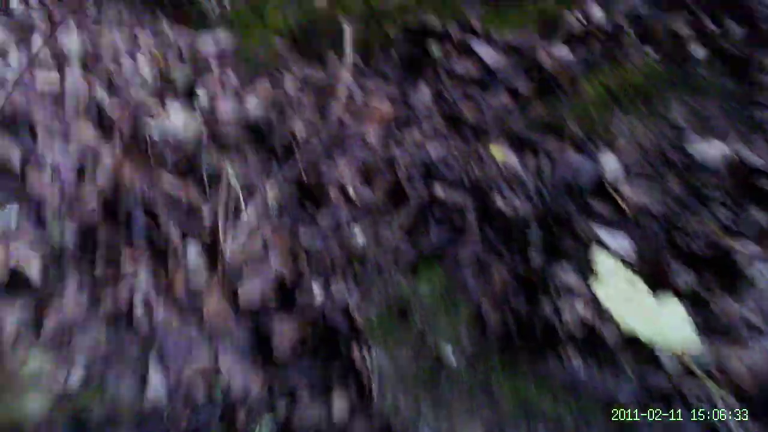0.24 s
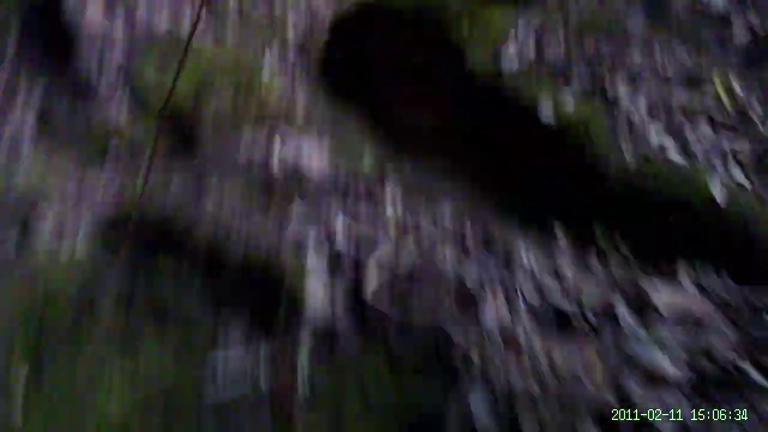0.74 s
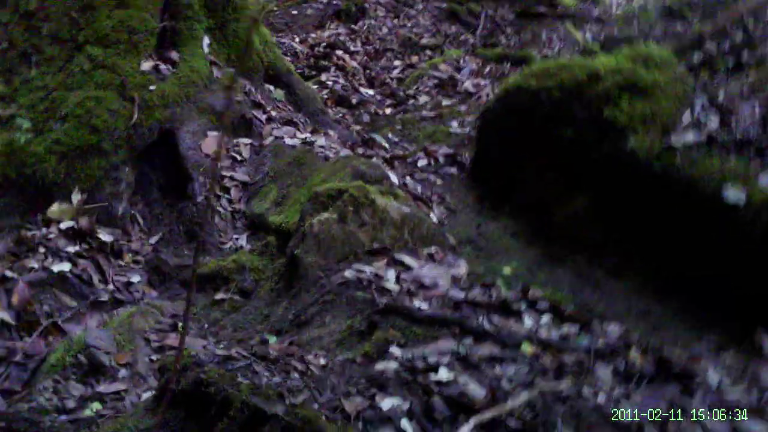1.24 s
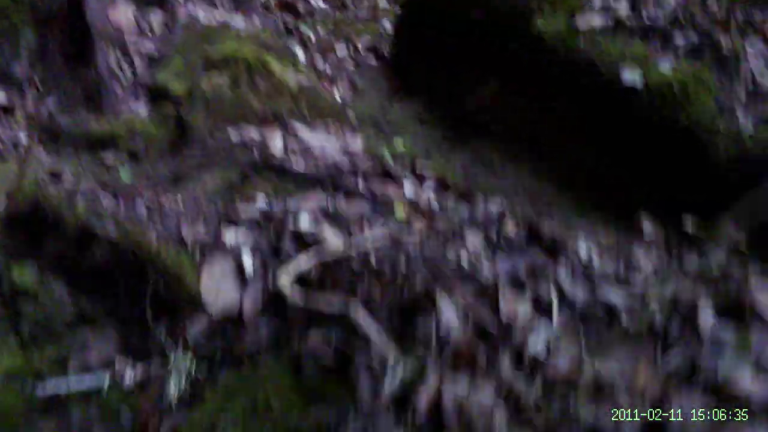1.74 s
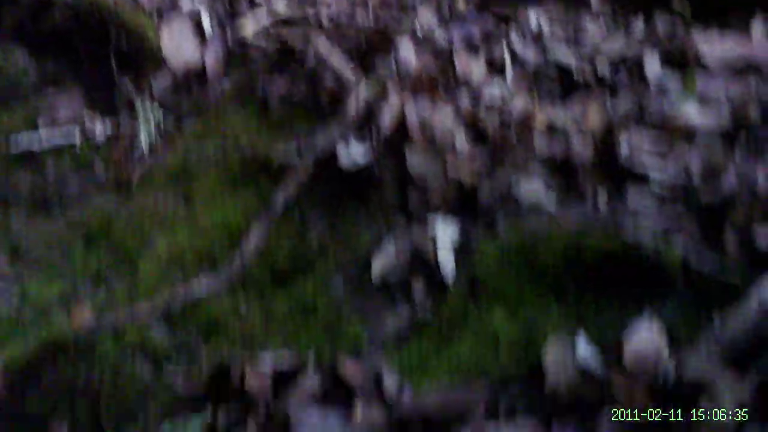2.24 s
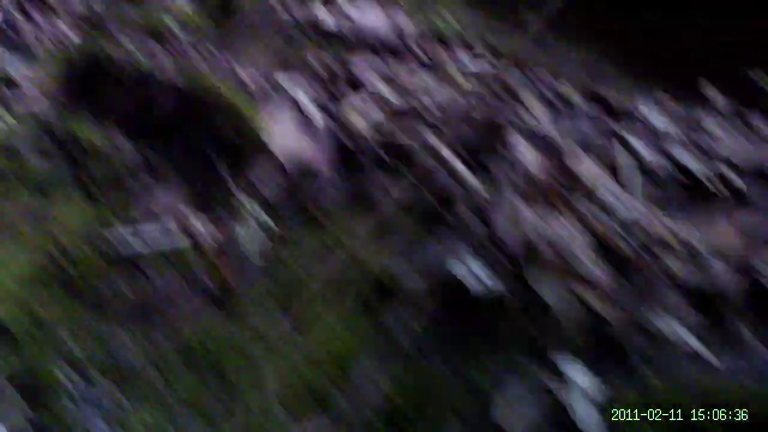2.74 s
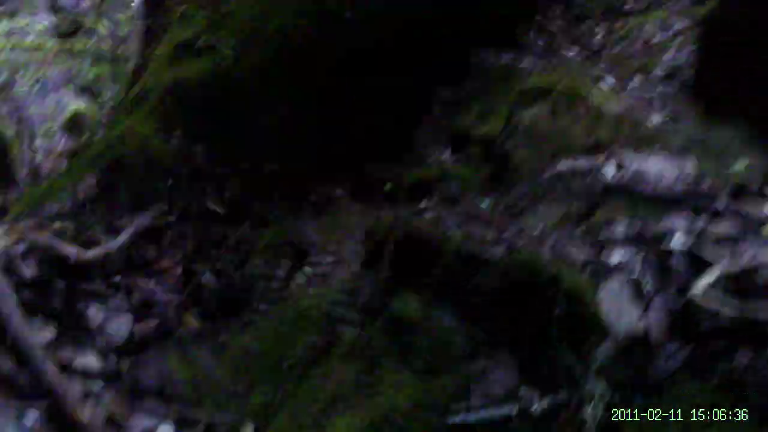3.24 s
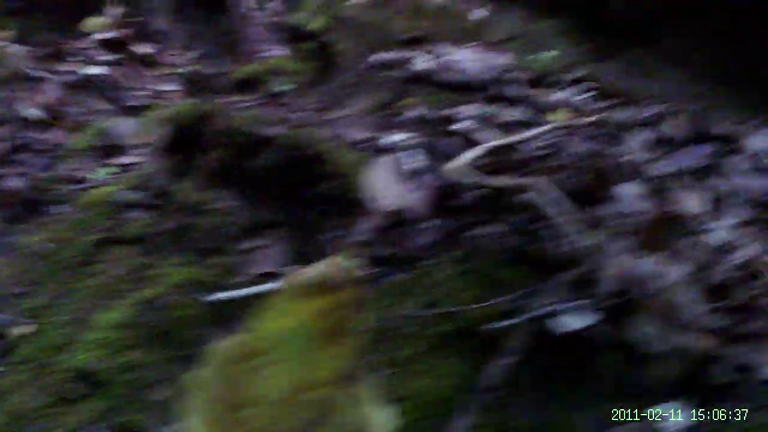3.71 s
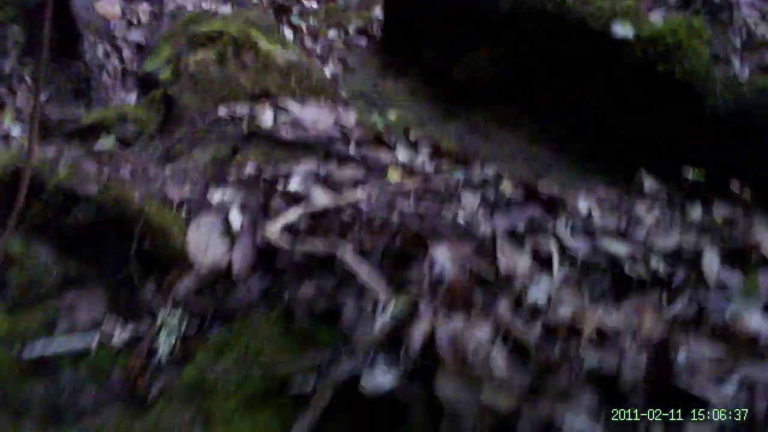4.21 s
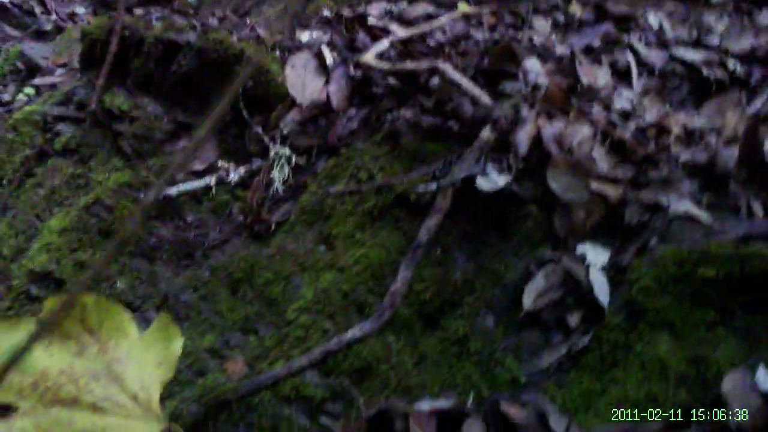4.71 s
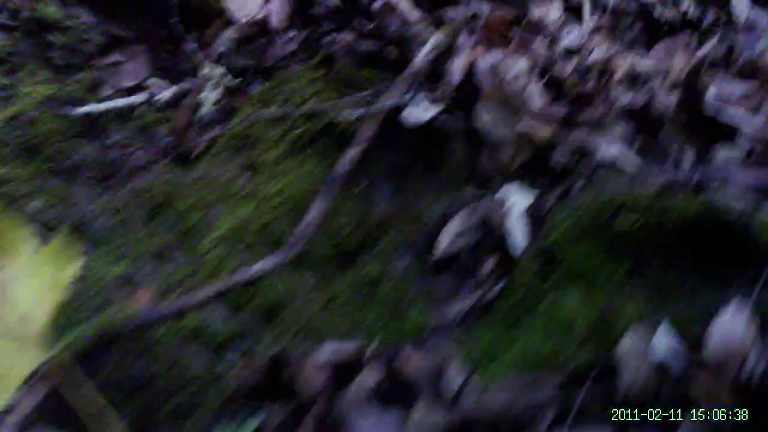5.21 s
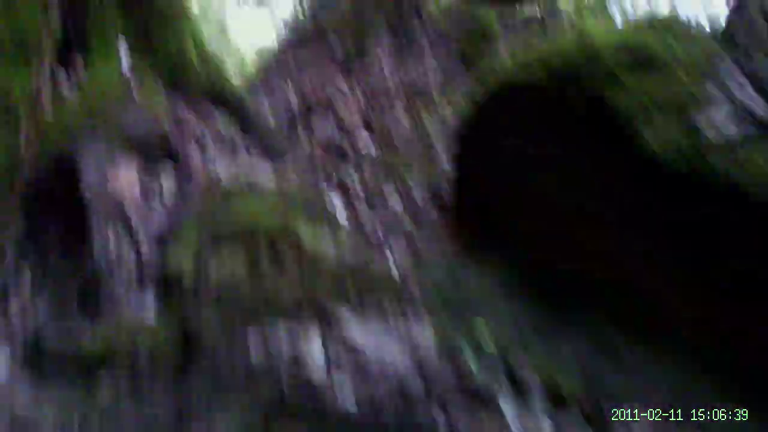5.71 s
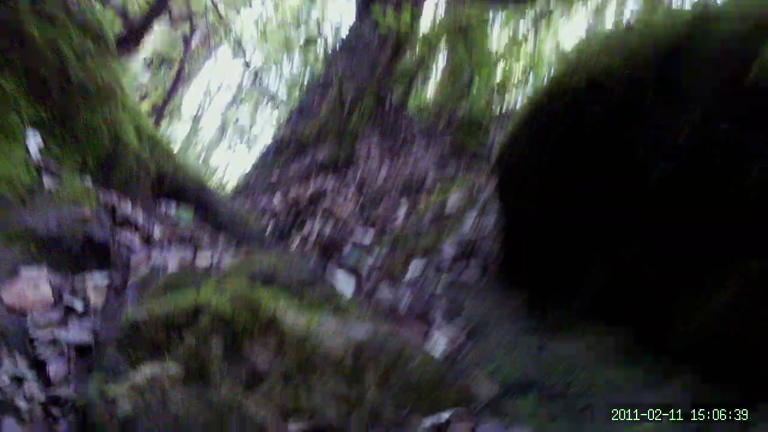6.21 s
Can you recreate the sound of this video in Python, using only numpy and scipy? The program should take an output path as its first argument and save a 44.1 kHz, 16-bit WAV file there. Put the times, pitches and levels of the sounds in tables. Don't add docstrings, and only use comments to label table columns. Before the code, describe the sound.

Bright little collar-bell chimes over constant dry leaf rustle, crisp cracks and twig snaps, with faint hiss and rapid electronic ticking underneath.

```python
import sys
import numpy as np
from scipy import signal
from scipy.fft import rfft, irfft, next_fast_len
from scipy.io import wavfile
from scipy.ndimage import uniform_filter1d

SR = 44100
rng = np.random.default_rng(int(sys.argv[2]) if len(sys.argv) > 2 else 0)


def to_wav(sig):
    pcm = np.clip(np.atleast_2d(sig), -1, 1) * 32767
    pcm = np.round(pcm).astype(np.int16)
    wavfile.write(sys.argv[1], SR, pcm.T)


def ratio(d):
    e = np.asarray(d, float) / 20
    return 10 ** e


N = 284886
RING_N = 15000
CRACK_LEAD_S = 64 / SR


def evened(x):
    return x / np.sqrt(np.mean(x ** 2) + 1e-20)


def smoothed_noise(width):
    return evened(uniform_filter1d(uniform_filter1d(rng.standard_normal(N), width), width))


def add(mix, s, sound):
    part = mix[max(round(s * SR), 0):][:len(sound)]
    part += sound[:len(part)]


def coloured(x, points):
    f, value = np.transpose(points)
    log_hz = np.log(abs(np.fft.fftfreq(2048, 1 / SR)) + 1)
    log_gain = np.log(ratio(np.interp(log_hz, np.log(f), np.maximum(value, -50))))
    phase = -signal.hilbert(log_gain).imag
    taps = np.fft.ifft(np.exp(log_gain + 1j * phase)).real[:1024]
    return signal.oaconvolve(x, taps)[:len(x)]


# (frequency [Hz], level [dB per Hz])
LEAF_COLOUR = [(150, -55), (400, -16), (800, -11.5), (2700, -14), (3700, -11), (4300, -4.5), (4750, -0.5),
               (5250, -7), (6100, -14.5), (9600, -15), (12500, -26), (15500, -36)]


def three_bands(x):
    size = next_fast_len(len(x) + 256)
    spectrum = rfft(coloured(x, LEAF_COLOUR), size)
    hz = np.fft.rfftfreq(size, 1 / SR)
    low = 1 / (1 + (hz / 3500) ** 10)
    high = 1 - 1 / (1 + (hz / 6600) ** 6)
    return [irfft(spectrum * share, size)[:len(x)] for share in (low, 1 - low - high, high)]


def crack(db, low_db, high_db):
    t = np.arange(-64, 700) / SR
    splinters = 0.22 * rng.standard_normal(len(t)) * ratio(-60 * t / 0.014) * (t > 0)
    low, peak, high = (band / abs(band).max() for band in three_bands((t == 0) + splinters))
    return ratio(db) * (peak + ratio(low_db) * low + ratio(high_db) * high)


# (lobes around, turn [deg], half waves up, lift [deg], gain [dB])
MODE_SHAPES = [(4.0, 166.2, 0.01, 0.2, -3), (5.0, 156.4, 1, 0.2, 7.5), (1.0, 139.6, 1.49, 170.6, 8),
               (4.0, 106, 1.1, 19.3, 9), (3.0, 143, 1.48, 0.2, -2.5), (3.0, 45.5, 0.01, 68, 5.5),
               (5.0, 110, 3.01, 110, -1), (5.0, 136, 2.09, 0.2, -7), (3.0, 100, 2.34, 0.2, -18.5),
               (6.7, 29, 1.96, 142, -10.5), (3.0, 140, 0.99, 57, -8), (5.0, 130, 1.43, 21, -1),
               (2.0, 136, 0.51, 60, -5), (2.0, 99, 2.01, 138, -6.5)]


def landing(hz, force_db, around, height, hardness_db):
    lobes, turn, waves, lift, gain_db = np.transpose(MODE_SHAPES)
    moves_around = np.cos(np.radians(np.round(lobes) * around + turn))
    moves_up = np.cos(np.pi * waves * height + np.radians(lift))
    shape_db = 20 * np.log10(abs(moves_around * moves_up) + .03)
    return force_db + gain_db + shape_db + hardness_db * np.log2(hz / 4000)


# (strike time [s],
# mode [Hz], gain [dB], slower fading [dB per s])
ACCENTS = [(0.0, 1738, -12, 200.0), (0.0, 5470, -8, 180.0), (0.31, 1738, -0.5, 66), (0.31, 5470, -5.5, 195),
           (0.463, 5470, 1, 152), (0.463, 12080, -10.0, 0.0), (1.438, 6190, 12, -250.0),
           (1.438, 10900, -12.0, 0.0), (1.819, 1738, 2.5, -150.0), (1.819, 8335, 4, -77),
           (1.819, 9190, -8.0, 0.0), (1.819, 9900, -7.0, 160.0), (1.819, 10165, -1, 0.0),
           (1.819, 13660, 6.0, -100.0), (2.476, 10165, -8, 0), (2.568, 1738, -3, 198),
           (2.568, 7290, 4.5, -150.0), (2.623, 4195, 12, -50.0), (2.814, 1738, -1, 147),
           (2.814, 6190, 13, -240.0), (2.814, 8335, -7.0, 10.0), (3.209, 3805, 4, 60.0),
           (3.209, 8335, 14, -250.0), (3.321, 4195, -7.0, 0.0), (3.321, 8335, 13, 0.0),
           (3.321, 10165, 4.5, 0.0), (3.321, 10900, 4.0, 0.0), (3.356, 4195, 15.5, -250.0),
           (3.356, 10165, 10, -60.0), (3.688, 7290, 11, -140.0), (3.781, 7290, 1.5, 130.0),
           (3.781, 8335, 4, -170.0), (3.897, 10165, 2.5, 10.0), (3.998, 7290, 3, 0.0),
           (3.998, 9190, -5, 0.0), (3.998, 12080, -12.0, 0.0), (4.221, 10900, 10, 0.0),
           (4.327, 5470, 7.5, -300.0), (4.327, 6190, -9.0, 0.0), (4.327, 8335, -9.0, 0.0),
           (4.327, 9190, 6, -250.0), (4.327, 9900, -9.0, 0.0), (4.327, 10165, -9.0, 0.0),
           (4.327, 12080, -4.0, 0.0), (4.327, 13660, 10.0, 0.0), (4.37, 1738, 2.5, 97),
           (4.37, 5470, 4.5, 100.0), (5.972, 5470, -1.5, 123), (5.972, 8335, 6, -180.0),
           (5.972, 10165, 7.5, -160.0),
           (0, 7320, 3, 100), (.463, 4205, 3, 100), (1.932, 6180, -8, 0), (2.476, 10040, 4, 120),
                (2.476, 8345, -8, 0), (3.209, 7320, -1, 130), (3.688, 11000, -1, -150),
                (3.998, 3815, 3, 80), (.463, 8345, 1, -200)]


def accent(s, hz, t60):
    gain_db, slower = np.zeros((2, len(hz)))
    for at, mode_hz, db, db_per_s in ACCENTS:
        if abs(at - s) < .006:
            k = np.argmin(abs(hz - mode_hz))
            gain_db[k] = db + .018 * db_per_s
            slower[k] = db_per_s
    return gain_db, 60 / np.maximum(60 / t60 - slower, 70)


# (time [s], level kept [dB], spared mode [Hz])
BRUSHES = [(.385, -8, 4205), (.54, -2, 4205), (.765, -9, 3815), (1.19, -5, 8345), (1.49, -10, 1738),
           (2.0, -9, 4205), (3.29, -8, 3815), (3.748, 1, 3815), (3.952, -12, 3815), (4.405, -8, 3815),
           (6.005, -12, 3815)]


def brushing(s, hz):
    brush_s = .02
    t = s + np.arange(RING_N)[:, None] / SR
    gain_db = 0
    for at, kept_db, spared_hz in BRUSHES:
        if 0 < at - s < .3:
            muffled = abs(hz / spared_hz - 1) > .05
            gain_db = gain_db + kept_db * np.clip((t - at) / brush_s, 0, 1) * muffled
    return gain_db


def ring(hz, db, t60, split_hz, chance, free_s, sag_per_s=0):
    t = np.arange(RING_N)[:, None] / SR
    hz = hz * (1 - sag_per_s * t / 2)
    phase, twin, flutter_rate, flutter_phase = chance
    pair = np.sin(2 * np.pi * (hz * t + phase))
    pair = pair + 0.5 * twin * np.sin(2 * np.pi * ((hz + split_hz) * t + phase))
    pair = pair / (1 + 0.4 * twin)
    flutter_db = 2.57 * np.sin(2 * np.pi * ((12 + 30 * flutter_rate) * t + flutter_phase))
    rise = np.minimum(t * hz / 3, 1) * np.minimum((t[-1] - t) / 0.04, 1)
    left = 1 - 0.5 * np.clip((t - free_s) / 0.0013, 0, 1)
    return (ratio(db + flutter_db - 60 * (t - .018) / t60) * pair * rise * left).sum(1)


# (pitch at first [Hz], pitch once the collar has turned [Hz], split of the pair [Hz],
# t60 [s], trim [dB])
BELL_MODES = [(1738, 1729, 8.4, 0.26, 1), (3815, 3800, 7.2, 1, -3), (4205, 4178, 4.5, 0.71, -3),
              (5470, 5470, 4.6, 0.18, -2), (6180, 6200, 23, 0.36, 2.5), (7320, 7267, 35, 0.3, 3),
              (8345, 8330, 14, 0.3, 0), (9100, 9180, 16, 0.16, -0.5), (10040, 9790, 14, 0.17, 7),
              (10200, 10160, 35, 0.28, 4), (11000, 10770, 14, 0.3, -4), (11500, 11450, 7.8, 0.19, -14),
              (12100, 12000, 10, 0.1, -14), (13660, 12700, 10, 0.12, -18.5)]
# (time [s], force [dB], place around [deg], height [0-1], hardness [dB per octave])
STRIKES = [
    (0.0, -40, 28.7, 0.21, -5.5),
    (0.087, -46.5, 0.2, 0, -3),
    (0.31, -32.5, 19.5, 0.19, -5.5),
    (0.463, -40.5, 91.5, 0.703, -2),
    (0.698, -46, 77, 0.99, -7.5),
    (0.8, -51, 69.2, 0.6, -13.5),
    (1.153, -43, 63.2, 0.39, -4),
    (1.438, -43, 64, 0.99, 2),
    (1.8181, -35, 46.5, 0.75, 0.5),
    (1.932, -39.5, 23.7, 0.16, -11),
]
# (time [s], force [dB], place around [deg], height [0-1], hardness [dB per octave])
STRIKES_TURNED = [(2.476, -35, 128, 0.303, -2), (2.568, -36.5, 95, 0.15, 4), (2.623, -50, 164, 0.26, -3.5),
                  (2.814, -46, 153, 0.803, -0.5), (2.988, -42, 3.8, 0.003, 0.7), (3.209, -43, 61, 0.3, 7),
                  (3.321, -32.5, 122, 0.62, -4.5), (3.356, -44.5, 144, 0.49, 0.5),
                  (3.689, -35.5, 138.2, 0.77, 0.5), (3.781, -49, 156.2, 0.75, 5),
                  (3.8964, -31.5, 168.2, 0.21, -1.2), (3.998, -40, 129.2, 0.96, 0.5),
                  (4.039, -50.5, 0.2, 0.8, -2.5), (4.221, -42, 139, 0.24, -1.5),
                  (4.3266, -33, 80, 0.94, 4.5), (4.369, -42, 114.2, 0.08, -10), (5.615, -47, 111.2, 1, -11),
                  (5.804, -43, 128, 0.003, -8), (5.972, -31, 24.3, 0.99, -2.5)]


def bell():
    turned_s = 2.3
    out = np.zeros(N)
    first_hz, later_hz, split_hz, t60, trim_db = np.transpose(BELL_MODES)
    times = np.sort([row[0] for row in STRIKES + STRIKES_TURNED + PRESSED] + [N / SR])
    for s, *hit in STRIKES + STRIKES_TURNED:
        chance = rng.random((4, len(BELL_MODES)))
        db = landing(first_hz, *hit) + trim_db
        free_s = times[times > s + .01][0] - s
        hz, ring_s = first_hz, t60
        if s >= turned_s:
            hz, ring_s = later_hz, 0.85 * np.minimum(t60, .55)
        gain_db, ring_s = accent(s, first_hz, ring_s)
        mode_db = db + gain_db + brushing(s, first_hz)
        add(out, s, ring(hz, mode_db, ring_s, split_hz, chance, free_s))
        add(out, s - CRACK_LEAD_S, crack(max(db[3:]) + 3.5, -24, -8))
    return out


# (middle [s], length [s], level [dB], high share [dB])
SCUFFS = [(.01, 0.29, -55, -25), (0.233, 0.41, -46.5, -16), (0.485, 0.27, -48, -14),
          (0.765, 0.58, -45.5, -11), (1.03, 0.39, -48.5, -14), (1.32, 0.41, -45.5, -14),
          (1.552, 0.1, -46, -12), (1.74, 0.73, -52, -22), (1.998, 0.53, -52, -17),
          (2.297, 0.58, -52.5, -27), (2.59, 0.18, -49, -25), (3.05, 0.34, -49.5, -15),
          (3.25, 0.34, -55.5, -14), (3.413, 0.46, -55, -13), (3.7, 0.14, -52, -27), (3.98, 0.67, -53, -12),
          (4.158, .2, -60, -17), (4.427, 0.19, -49, -10), (4.694, 0.55, -52, -18),
          (5.102, 0.38, -49.5, -16), (5.475, 0.43, -48, -9), (5.759, 0.25, -45.5, -13),
          (6.04, 0.37, -46, -19), (6.207, 0.17, -42, -16), (6.45, 0.53, -45.5, -11.5)]


def scuffing():
    stir_db, stir_high_db = -56, -17.5
    middle, length, db, high_db = np.transpose(SCUFFS)[..., None]
    swell = np.cos(np.pi * np.clip((np.arange(N) / SR - middle) / length, -.5, .5)) ** 2
    body = np.sqrt(ratio(stir_db) ** 2 + (ratio(db) ** 2 * swell).sum(0))
    top = np.sqrt(ratio(stir_db + stir_high_db) ** 2 + (ratio(db + high_db) ** 2 * swell).sum(0))
    return body, top


def crackle(per_s, spread_db, smooth):
    size = ratio(spread_db * np.minimum(rng.exponential(1, N), 3))
    size = size * np.clip(rng.standard_normal(N), -2, 2)
    return evened(size * (rng.random(N) < per_s / SR)) + smooth * rng.standard_normal(N)


def rustle():
    body, top = scuffing()
    clumping = ratio(1.8 * smoothed_noise(400) + 1.48 * smoothed_noise(1800))
    low, peak, high = map(evened, three_bands(crackle(3500, 1.7, 0.93) * clumping))
    return ratio(2.5) * (body * (peak + ratio(-10.5) * low) + ratio(-0.5) * top * high)


# (frequency [Hz], level [dB per Hz])
HISS_COLOUR = [(100, 6), (250, 0.5), (530, -7.5), (1350, -14.5), (2600, -16), (6600, -16), (16000, -16.5)]


def hiss():
    return ratio(-51.5) * evened(coloured(rng.standard_normal(N), HISS_COLOUR))


def processor():
    first, period, work = .005, 1152 / 44100, .006
    frame_first, frame_period, frame_work = .0135, 1 / 25, .005
    steps = np.zeros(N)

    def step(s, size):
        add(steps, s, np.array([size]))

    for a in np.arange(first, N / SR, period):
        lag = (a - frame_first) % frame_period
        wait = frame_period - lag
        fresh = np.clip((.0135 - lag) / .003, 0, 1) * (lag > frame_work)
        step(a, -1 - 1.67 * fresh)
        if lag < frame_work:
            step(a + work + frame_work - lag, 1.9)
        elif wait < .0125:
            step(a + max(wait, work) + frame_work, 1.9)
            step(a + work, 0.47 * (wait > work))
        else:
            step(a + work, 0.26 + 0.74 * fresh)
            step(a + work + .0055, 0.67 * (1 - fresh))
    for b in np.arange(frame_first, N / SR, frame_period):
        since = (b - first) % period
        if since > .0125:
            step(b, -1.1)
            step(b + frame_work - .001, 1.21 * (period - since > frame_work - .001))
    u = np.arange(1500) / SR / 0.0019
    pulse = u * np.exp(1 - u) + 0.18 * u * np.exp(1 - 7.9 * u)
    sag = signal.oaconvolve(steps * ratio(2.1 * rng.standard_normal(N)), pulse)[:N]
    return ratio(-41.0) * signal.sosfilt(signal.butter(1, 14, "highpass", fs=SR, output="sos"), sag)


def damped_tones(rows):
    out, t = np.zeros(N), np.arange(4000) / SR
    for s, db, hz, t60 in rows:
        start = np.minimum(t * hz / 2.04, 1)
        scratch = evened(uniform_filter1d(rng.standard_normal(len(t)), 30))
        wander = np.cumsum(scratch) * .022 * (hz < 1600)
        add(out, s, ratio(db - 60 * t / t60) * start * np.sin(2 * np.pi * hz * t + wander))
    return out


# (time [s], peak level [dB], pitch [Hz])
KNOCKS = [(0.073, -34, 2100), (.26, -34.5, 334), (.913, -27, 9200), (1.439, -27.5, 1710), (1.893, -41, 820),
          (1.998, -35.5, 582), (3.07, -33.5, 342), (3.228, -29.5, 2000), (3.251, -38, 1880),
          (3.668, -39, 1220), (3.749, -38, 920), (4.755, -40, 860), (4.815, -37.5, 1010), (5.522, -37, 440),
          (5.93, -38, 1410), (5.959, -31, 1320), (6.199, -37, 980), (6.229, -27.5, 716)]


def knocks():
    return damped_tones([(s, db, hz, 0.027 * (1000 / hz) ** 0.69) for s, db, hz in KNOCKS])


# (time [s], port peak level [dB], low part [dB], high part [dB])
CRISPS = [(0.0967, -40, -60.0, -35), (0.2155, -31, -55, -46), (0.4245, -45, -42, -47.0),
          (0.5221, -43.0, -60.0, -39.5), (0.6158, -37, -54.0, -60.0), (0.6911, -36, -48, -49.0),
          (0.828, -27.0, -49, -47.0), (1.0383, -30, -58.0, -50.0), (1.263, -28.0, -44.0, -47),
          (1.3262, -38, -60.0, -35.0), (1.5106, -26.5, -50.0, -58.0), (1.5143, -31.0, -60.0, -53.0),
          (1.5531, -43.0, -42.0, -54.0), (1.5626, -29, -39.0, -51.0), (1.6987, -29, -51.0, -54),
          (1.8172, -21, -42, -27), (2.0097, -30, -42, -52.0), (2.176, -36.5, -56.0, -59.0),
          (3.1243, -42, -56.0, -39.0), (3.1369, -56.0, -60.0, -36.0), (3.1405, -56.0, -62, -41.0),
          (3.153, -30, -44, -39), (3.2304, -27, -35.0, -47.0), (3.3324, -39.0, -44, -38.0),
          (3.3674, -27, -40, -37.0), (3.6711, -54.0, -44, -56.0), (3.8967, -25.5, -53, -34),
          (4.0698, -40, -60.0, -35), (4.1326, -48.0, -59.0, -38), (4.358, -40.0, -48.0, -38.0),
          (4.4085, -56.0, -43.0, -50.0), (4.5248, -28, -43, -49), (4.8914, -56.0, -41, -58.0),
          (4.9397, -40.0, -42, -41.0), (4.987, -25, -45, -55), (4.991, -33, -38, -50),
          (5.0262, -41, -39, -53), (5.033, -26, -40.0, -47), (5.0429, -56.0, -45.0, -58.0),
          (5.095, -27.0, -47, -30), (5.0983, -31.0, -47, -38), (5.7222, -35.0, -42, -40.0),
          (5.7556, -34.0, -55.0, -56.0), (6.0513, -33.0, -60.0, -52.0), (6.1664, -27.0, -55.0, -41),
          (6.212, -38, -39, -42.0), (6.3069, -47.0, -45.0, -39.0), (6.3348, -56.0, -58.0, -41.0),
          (6.403, -26, -59.0, -56.0), (6.4082, -30.0, -53.0, -46.0)]


def crisps():
    out = np.zeros(N)
    for s, db, low_db, high_db in CRISPS:
        add(out, s - CRACK_LEAD_S, crack(db + 0.5, low_db - db, high_db - db))
    return out


# (time [s], peak level [dB], low share [dB])
TWIGS = [(0.0987, -22.5, -4.5), (0.7679, -21, -18), (0.839, -27, -18), (1.5725, -18.5, -21),
         (1.697, -24, -19), (2.2048, -18.5, -15), (2.9445, -32, -5), (3.5802, -36.5, 12.5), (3.68, -24, -6),
         (4.597, -17.5, -18), (4.6557, -25.5, -15), (4.783, -18.5, -18), (4.9122, -22, -8.5),
         (4.923, -18.5, -10), (4.983, -19, -8), (4.9957, -16, -15), (6.2297, -13, -18)]
# (time [s], peak level [dB])
TICKS = [(0.176, -31), (0.199, -11), (0.2947, -15), (0.7918, -10), (1.02, -19), (1.252, -14.5),
         (1.285, -14), (1.3389, -28), (1.5035, -15), (1.547, -9.5), (1.73, -21), (2.0102, -24),
         (3.039, -13), (3.094, -14), (3.3585, -5.5), (3.481, -22), (4.5253, -11.5), (4.949, -33),
         (5.045, -13), (5.4803, -21), (5.5224, -22), (5.8459, -13.5), (6.399, -13)]
# (time [s], peak level [dB], high share [dB])
SPLINTERS = [(0.5194, -39, -16), (0.694, -20, -8), (1.322, -15, -4.5), (3.1222, -28, -6),
             (3.148, -14.5, -14), (3.217, -15, -7), (3.46, -21.5, 5), (4.066, -20, -11), (4.123, -21.5, -8),
             (4.1834, -20.5, -12), (4.4284, -18, -17), (5.6911, -18.5, 3)]


def snaps():
    out = np.zeros(N)
    rows = [(s, db, low_db, -34) for s, db, low_db in TWIGS]
    rows += [(s, db, -25, -48) for s, db in TICKS]
    rows += [(s, db, -26, high_db) for s, db, high_db in SPLINTERS]
    for s, db, low_db, high_db in rows:
        add(out, s - CRACK_LEAD_S, crack(db - 11.5, low_db + 5.5, high_db + 1.5))
    return out


# (time [s], length [s], level [dB], low share [dB])
CRUSHES = [(0.182, 0.092, -43, -10), (0.804, 0.047, -36, -10), (1.245, 0.024, -35.5, -18),
           (1.323, 0.062, -29, -12.5), (3.212, 0.016, -41, -13), (4.508, 0.035, -41, -13.5),
           (4.618, 0.019, -38, -14), (4.942, 0.02, -32, -7), (4.984, 0.02, -42, -2),
           (5.019, 0.031, -36, -8), (5.685, 0.051, -35, -11.5), (3.459, 0.011, -43, -28),
           (3.659, 0.039, -50, 2), (6.388, 0.077, -58, 0)]


def crushes():
    low, peak, high = map(evened, three_bands(crackle(2500, 0.94, 0.29)))
    out = np.zeros(N)
    for s, length, db, low_db in CRUSHES:
        at = slice(int(s * SR), min(int((s + length) * SR), N))
        push = signal.windows.tukey(at.stop - at.start, .9)
        out[at] += ratio(db) * push * (peak[at] + ratio(low_db) * low[at] + ratio(-20.0) * high[at])
    return out


# (time [s], length [s], peak level [dB], pitch [Hz], glide [Hz])
SQUEAKS = [(0.277, 0.026, -50, 8340, 0), (0.587, 0.028, -54, 8340, 0), (1.398, 0.023, -39, 1750, 130),
           (1.494, .055, -46, 8960, -40), (1.505, .055, -50.5, 1750, 0), (1.71, .08, -55, 9070, 0),
           (2.062, 0.039, -54, 9060, 0), (2.645, 0.073, -53, 9000, 0), (6.268, 0.018, -40.5, 1910, 150)]


def squeaks():
    out = np.zeros(N)
    for s, length, db, hz, glide_hz in SQUEAKS:
        u = np.arange(int(length * SR)) / (length * SR)
        swell = np.sin(np.pi * u ** 0.55)
        tremble = ratio(2.5 * np.sin(2 * np.pi * 55 * length * u))
        tone = np.sin(2 * np.pi * length * u * (hz + glide_hz * u / 2))
        add(out, s, ratio(db) * swell * tremble * tone)
    return out


# (time [s], peak level [dB], pitch [Hz])
POPS = [(.943, -43.5, 1070), (1.452, -52, 1500), (1.545, -51, 1515), (1.761, -50, 525), (2.15, -43.5, 1090),
        (2.3, -48, 866), (2.34, -53, 2000), (2.612, -41, 903), (2.217, -44.5, 2520), (3.41, -45, 1480),
        (3.579, -41, 875), (4.078, -43, 710), (5.035, -36, 1304), (5.67, -43.5, 730), (6.088, -43, 1380),
        (1.763, -48, 1520), (6.296, -40, 1084), (6.43, -41, 1150)]


def pops():
    return damped_tones([(*row, 0.079) for row in POPS])


# (time [s], level [dB], pitch sag [per s])
PRESSED = [
    (4.802, -32.5, .1),
    (6.2935, -23.5, .35),
    (5.0955, -32.5, .03),
    (6.1617, -32, 0.024),
]
# (pitch [Hz], level [dB], t60 [s])
PRESSED_MODES = [
    [(1570, -13, 0.23), (3380, -5.5, 0.11), (3650, -8, 0.12), (5330, 2.5, 0.14), (6320, -14, 0.18),
     (7100, -20, 0.088), (8120, -6, 0.11), (9033, -17, .12), (9970, -8.5, .07)],
    [(1690, -20, 0.35), (4080, -2, 0.11), (4160, -5, 0.15), (5500, -4.5, 0.21), (6230, -20, 0.14),
     (7100, -11, 0.13), (8330, -14, 0.16), (10160, -14, 0.16), (11660, -16, 0.08)],
    [(1733, 1.5, 0.21), (3795, -3, 0.26), (5460, 0.5, 0.15), (7195, -4, 0.26), (8323, -13, 0.22),
     (10140, -12, .15), (10760, -3.5, 0.11), (11400, -19, .12)],
    [(1730, -8.5, 0.43), (3790, -15, .3), (4180, -6.5, 0.58), (5440, 2, 0.16), (7220, -2, 0.37),
     (8323, -15, 0.16), (11300, -22, .12)],
]


def pressed_bell():
    out = np.zeros(N)
    for (s, db, sag), modes in zip(PRESSED, PRESSED_MODES):
        hz, mode_db, t60 = np.transpose(modes)
        chance = rng.random((4, len(hz)))
        add(out, s, ring(hz, db + mode_db - 60 * 0.018 / t60, t60, 6, chance, 0.12, sag))
        add(out, s - CRACK_LEAD_S, crack(db, -13, -2.5))
    return out


def scene():
    near = bell() + knocks() + crisps() + snaps() + crushes() + squeaks() + pops() + pressed_bell()
    ground = np.zeros(900)
    ground[[0, 95, 230, 410, 690]] = [1, 0.056, -0.036, 0.11, -0.076]
    return np.tile(signal.oaconvolve(near, ground)[:N] + rustle(), (2, 1))


def roll_off(x):
    return signal.sosfilt(signal.butter(12, 16450, fs=SR, output="sos"), x)


def record(dry):
    edge = signal.firwin(301, 16050, window=("kaiser", 9), fs=SR)
    mix = signal.oaconvolve(dry + hiss() + processor(), edge[None], "same")
    return roll_off(mix)


dry = scene()
out = record(dry)
to_wav(out)
```